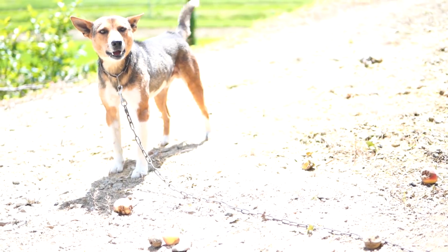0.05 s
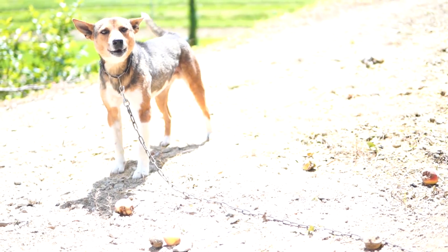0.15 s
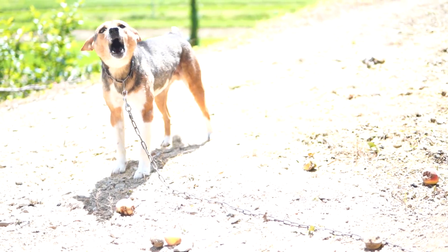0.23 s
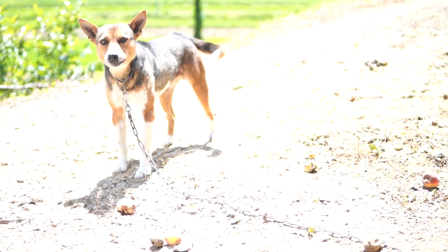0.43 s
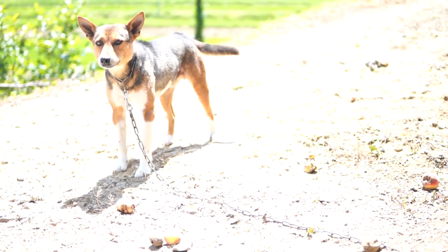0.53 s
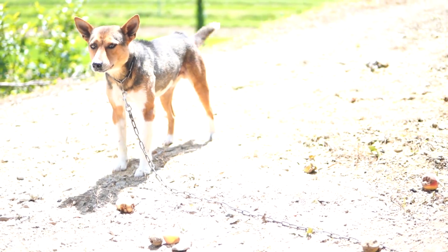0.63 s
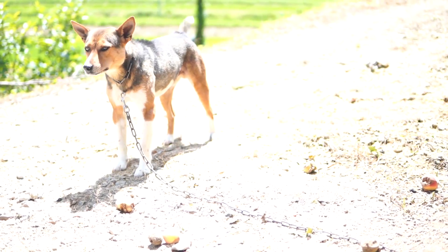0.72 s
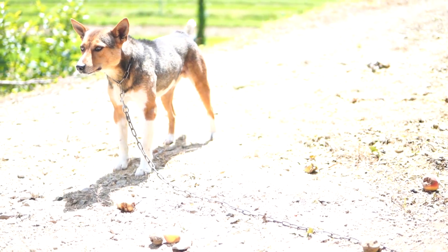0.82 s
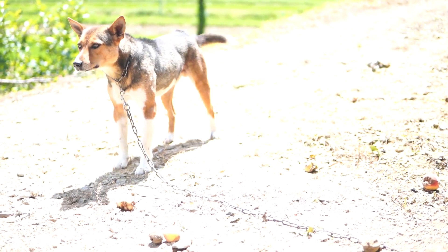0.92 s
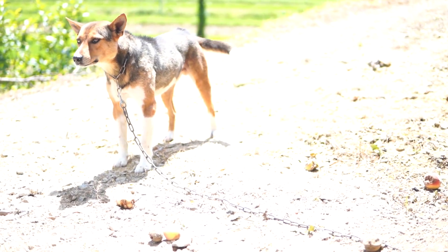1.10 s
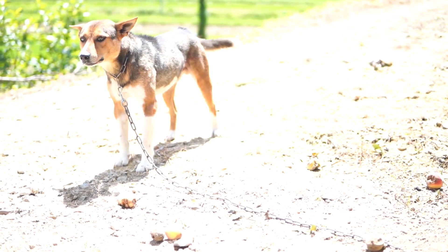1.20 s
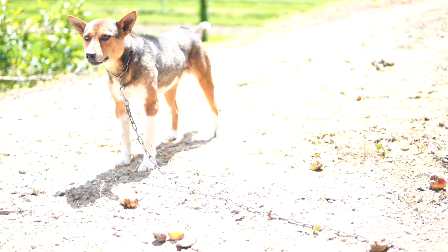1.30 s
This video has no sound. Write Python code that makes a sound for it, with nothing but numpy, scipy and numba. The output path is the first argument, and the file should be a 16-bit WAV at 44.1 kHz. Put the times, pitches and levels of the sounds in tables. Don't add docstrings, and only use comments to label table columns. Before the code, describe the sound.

Single sharp bark from a medium dog outdoors, arched yelp with hoarse end, faint echo

```python
import sys
import numpy as np
from scipy import signal
from scipy.fft import rfft, irfft
from scipy.io import wavfile
from scipy.ndimage import uniform_filter1d
from numba import njit

SR = 44100
rng = np.random.default_rng(int(sys.argv[2]) if len(sys.argv) > 2 else 0)


def wav_record(signal):
    frames = np.transpose(np.atleast_2d(signal))
    bounded = np.clip(frames, -1, 1)
    quanta = np.round(bounded * 32767).astype(np.int16)
    wavfile.write(sys.argv[1], SR, quanta)


def volts(x):
    e = np.asarray(x, float) / 20
    return 10 ** e


N = 59535

# t/s, first resonance f/Hz, second resonance f/Hz, second level/dB
MOUTH = [
    (.2, 870, 1330, -3),
    (.218, 460, 870, -4.5),
    (.242, 616, 1020, 3.5),
    (.262, 698, 1100, -1.5),
    (.276, 720, 1380, 1),
    (.292, 703, 1386, -29),
    (.34, 760, 1380, -30),
    (.362, 664, 1175, -7.5),
    (.385, 742, 1239, -11),
]
# t/s, level/dB
EFFORT = [
    (.212, -56),
    (.221, -20.5),
    (.24, -8.5),
    (.27, -9),
    (.3, -5.5),
    (.34, -5.5),
    (.358, -5.5),
    (.366, -17.5),
    (.388, -25.5),
]


@njit
def svf(x, hz, width):
    y, b, l = np.empty(len(x)), 0., 0.
    for i in range(len(x)):
        g, k = np.tan(np.pi * hz[i] / SR), width / hz[i]
        v = (b + g * (x[i] - l)) / (1 + g * (g + k))
        b, l, y[i] = 2 * v - b, l + 2 * g * v, k * v
    return y


def band(x, hz, width_hz, count=1):
    for _ in range(count):
        x = svf(x + 1e-18, hz * np.ones(N), float(width_hz))
    return x


def unit(x):
    return x / np.sqrt(np.mean(x ** 2))


def curves(table):
    rows = np.array(table, float).T
    return [np.interp(np.arange(N) / SR, rows[0], column) for column in rows[1:]]


def walk(rate):
    hold = int(SR / rate)
    steps = np.repeat(rng.standard_normal(N // hold + 1), hold)
    return 1.5 * uniform_filter1d(uniform_filter1d(steps, hold), hold)[:N]


def yard_air():
    # f/Hz, level per Hz/dB
    hiss_tone = [(40, -24), (120, -11), (200, -14), (900, -23), (6000, -30.5), (7500, -38.5),
                 (13500, -49.5), (15600, -56)]
    hz = np.maximum(np.arange(N // 2 + 1) * SR / N, 1)
    tone_hz, tone_db = np.array(hiss_tone, float).T
    gain = volts(np.interp(np.log(hz), np.log(tone_hz), tone_db)) * (hz > 30)
    hiss = unit(irfft(rfft(rng.standard_normal(N)) * gain, N))
    rumble = unit(band(rng.standard_normal(N), 107, 30, count=2))
    murmur = unit(band(rng.standard_normal(N), 720, 280, count=2))
    hiss = hiss * volts(-59 + 0.57 * walk(6.5))
    rumble = rumble * volts(-61 + 3.8 * walk(9.9))
    return hiss + rumble + murmur * volts(-67.5 + 3.0 * walk(8.7))


def wind():
    # t/s, level/dB
    gusts = [(0.0, -17), (0.056, -35), (0.244, -45.5), (0.342, -68.5), (0.436, -41), (0.966, -52),
             (0.996, -45), (1.35, -37)]
    return unit(band(rng.standard_normal(N), 11, 8, count=3)) * volts(curves(gusts)[0])


def insect():
    # t/s, length/s, f/Hz (the first tunes both), level/dB
    chirps = [
        (0.713, 0.036, 9400, -79.5),
        (0.779, 0.063, 9100, -74.5),
    ]
    t, out = np.arange(N) / SR, 0
    buzz = unit(band(rng.standard_normal(N), chirps[0][2], 300, count=2))
    for start, length, _, db in chirps:
        swell = np.sin(np.pi * np.clip((t - start) / length, 0, 1))
        out = out + volts(db) * swell * buzz
    return out


@njit
def walls(x, lags, gain, damp):
    line, soft, out = np.zeros((8, 8192)), np.zeros(8), np.zeros(len(x))
    for i in range(len(x)):
        total = 0.
        for k in range(8):
            soft[k] += (1 - damp) * (gain[k] * line[k, (i - lags[k]) & 8191] - soft[k])
            total += soft[k]
        out[i] = soft[0] - soft[3] + soft[5] - soft[6]
        for k in range(8):
            line[k, i & 8191] = x[i] + soft[k] - total / 4
    return out


def yard_echo(bark):
    t60_s = 0.99
    lags = rng.integers(900, 5000, size=8)
    return volts(-42) * walls(bark, lags, volts(-60 * lags / SR / t60_s), .55)


def near_scatter(bark):
    start_s, end_s, fall_db = .05, .125, -6
    t = np.arange(SR // 5) / SR
    part = np.clip((t - start_s) / (end_s - start_s), 0, 1)
    swell = np.sqrt(np.sin(np.pi * part) + 1e-12) * volts(fall_db * part)
    scatter = rng.standard_normal(len(t)) * swell
    return volts(-35) * signal.fftconvolve(bark, scatter / np.sqrt(np.sum(scatter ** 2)))[:N]


def throat(x, second_db, middle_db, top_db, axis):
    # f/Hz, width/Hz, voiced level/dB, breath level/dB
    upper = [(2014, 360, -11.5, -14), (3111, 250, -8.5, -11.5), (4270, 590, -13, -16.5),
             (5236, 400, -5, -19.5), (6036, 680, -10, -21.5), (8380, 1800, -37, -28.5),
             (10970, 3600, -36, -37.5), (13800, 1400, -41.5, -40.5)]
    first_hz, second_hz = curves(MOUTH)[:2]
    first = band(x, first_hz, 238, count=2)
    second = volts(second_db) * band(x, second_hz, 240, count=2)
    high = [(-1) ** k * volts(r[axis]) * band(x, r[0], r[1], count=2) for k, r in enumerate(upper)]
    return first - second + volts(middle_db) * sum(high[:2]) + volts(top_db) * sum(high[2:])


def lip_click():
    start_s, t60_s = .2025, 0.017
    t = np.arange(N) / SR
    decay = np.exp(-np.log(1000) * np.maximum(t - start_s, 0) / t60_s) * (t > start_s)
    return volts(-54.5) * band(decay * rng.standard_normal(N), 4400, 1100, count=2) * 12


def panting_air(phase, voiced):
    # t/s, level/dB
    rush = [(0, -58.5), (.19, -60.5), (.215, -61.5), (.24, -19.5), (.268, -24), (.3, -37), (.355, -30.5),
            (.385, -21.5), (.41, -35), (.47, -50), (.5, -81)]
    flicker_db = 0.5 * walk(90) + 2.34 * walk(500)
    puff_db = 5.5 * np.cos(phase) * voiced
    air = rng.standard_normal(N) * volts(flicker_db + puff_db)
    return volts(curves(rush)[0]) * unit(throat(air, -13, 0, 0, axis=3) + volts(-45.5) * air)


def yelp(phase, scatter, half, push, after):
    # t/s, middle resonances level/dB, top resonances level/dB
    edge = [(.215, -24, -29.5), (.25, -10.5, -22), (.268, -16, -19), (.292, -7, -1.5), (.316, -7.5, -7),
            (.338, -6.5, -4.5), (.352, -2.5, -19), (.364, -16, -27), (.385, -12, -9.5)]
    t, shimmer = np.arange(N) / SR, walk(150)
    pulses = 0
    for k in range(1, 22):
        shimmer_db = 4 * min(k / 12, 1) ** 2 * np.roll(shimmer, 997 * k)
        pulses = pulses + np.sqrt(2) * np.cos(k * phase) * volts(shimmer_db)
    throb = (1 + half * np.cos(phase / 2)) * volts(30 * scatter * walk(200))
    flutter_hz, flutter_peak_s = 94.93, .2425
    throb *= 1 + 3.5 * scatter * np.cos(2 * np.pi * flutter_hz * (t - flutter_peak_s))
    middle_db, top_db = curves(edge)
    source = pulses * throb * push * volts(-700 * after)
    return throat(source, curves(MOUTH)[2], middle_db, top_db, axis=2)


def dog():
    # t/s, pitch f/Hz
    pitch = [
        (.212, 349.7),
        (.232, 437),
        (.25, 569.5),
        (.272, 699.4),
        (.295, 749.1),
        (.316, 785.9),
        (.338, 732.7),
        (.36, 628.5),
        (.385, 401.2),
    ]
    # t/s, cycle scatter/0-1, every second cycle weaker/0-1
    hoarse = [
        (.21, .05, .15),
        (.232, .09, .3),
        (.25, .16, .7),
        (.264, .14, .8),
        (.272, .008, .2),
        (.288, .003, .01),
        (.352, .003, .0),
        (.362, .08, .4),
        (.385, .14, .6),
    ]
    creak_s, creak_hz = .425, 96.4
    t, glide = np.arange(N) / SR, int(.012 * SR)
    scatter, half = curves(hoarse)
    hz = curves(pitch + [(creak_s, creak_hz)])[0]
    hz = uniform_filter1d(uniform_filter1d(hz, glide), glide) * (1 + scatter * walk(350))
    phase = 2 * np.pi * np.cumsum(hz) / SR
    voiced = t > EFFORT[0][0]
    push = voiced * volts(curves(EFFORT)[0])
    after = np.maximum(t - EFFORT[-1][0], 0)
    chest_end = np.clip((creak_s + 0.056 - t) / .02, 0, 1)
    chest = volts(-13.5 - 73 * after) * push * np.sin(phase) * chest_end
    return yelp(phase, scatter, half, push, after) + chest + panting_air(phase, voiced) + lip_click()


def scene():
    bark = dog()
    yard = near_scatter(bark) + yard_echo(bark)
    return (bark + yard + yard_air() + wind() + insect())[None]


def roll_off(x):
    return signal.sosfilt(signal.butter(12, 15670, fs=SR, output="sos"), x)


def record(dry):
    limit_db, span = -13, int(.01 * SR)
    power = uniform_filter1d(uniform_filter1d(dry ** 2, span), span)
    level = np.sqrt(np.abs(power) + 1e-12)
    held = dry * np.minimum(1, volts(limit_db) / level) ** .5
    return roll_off(np.tanh(0.72 * held) / 0.69)


dry = scene()
out = record(dry)
wav_record(out)
```